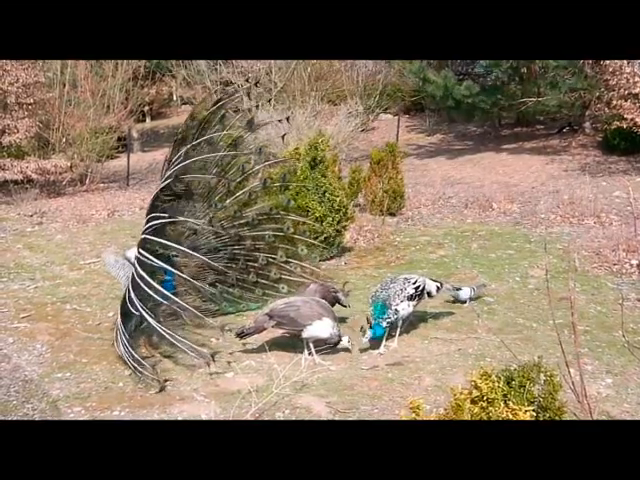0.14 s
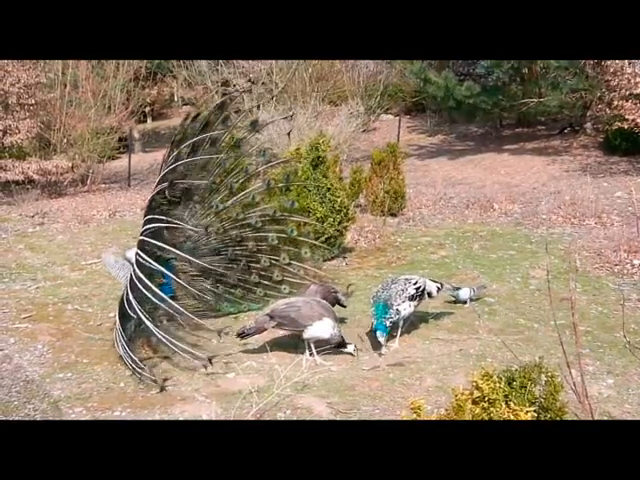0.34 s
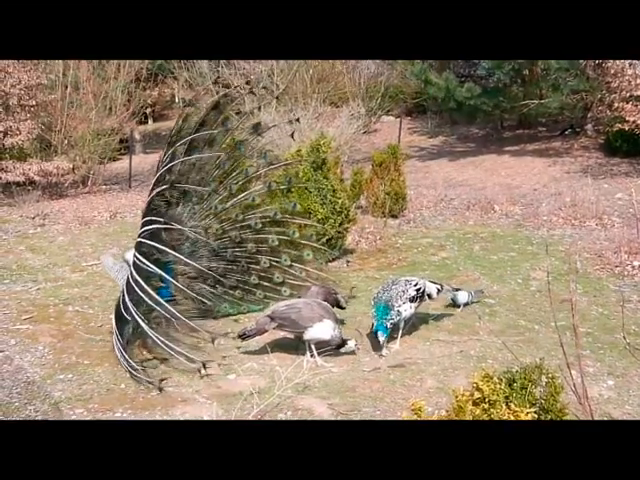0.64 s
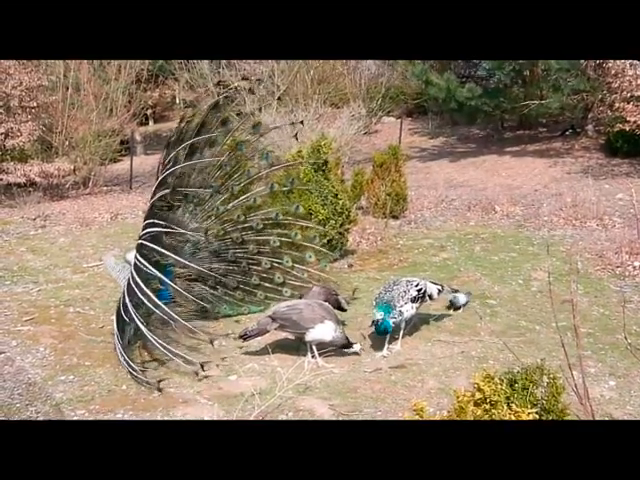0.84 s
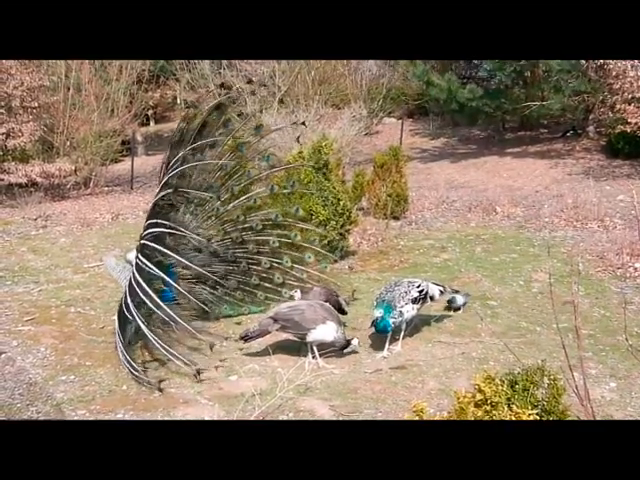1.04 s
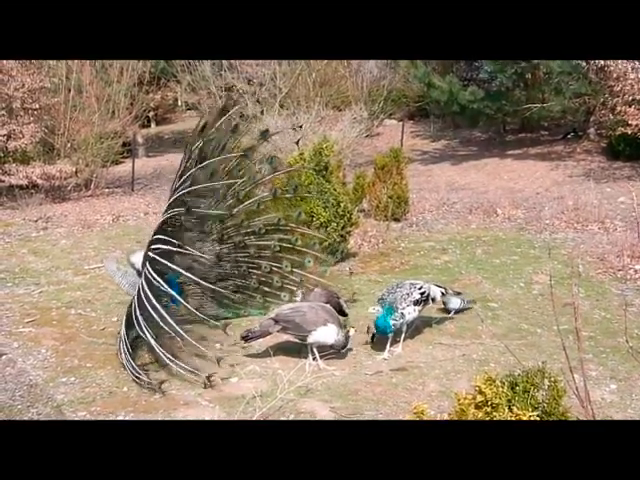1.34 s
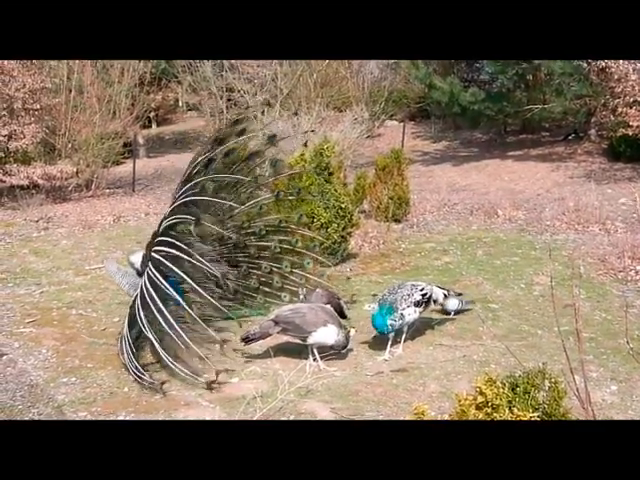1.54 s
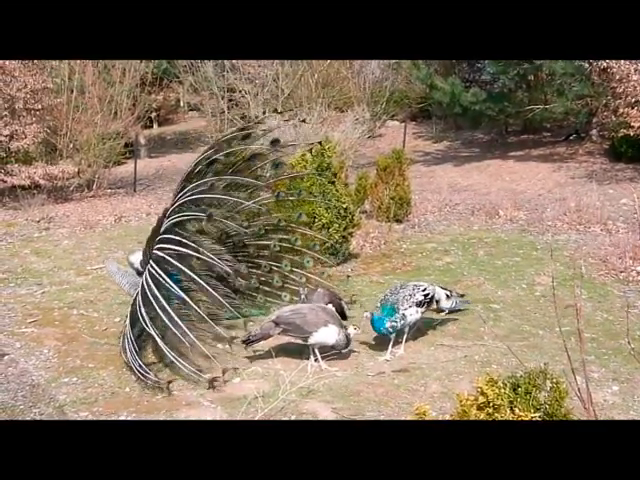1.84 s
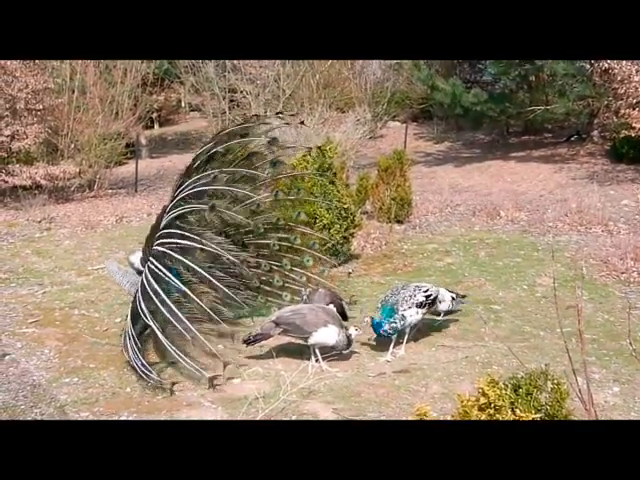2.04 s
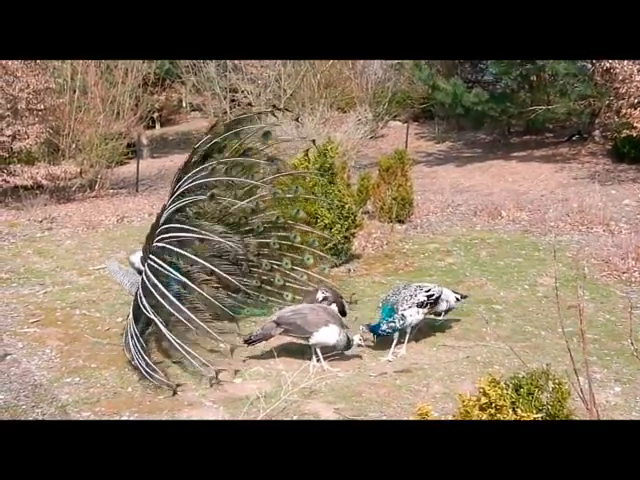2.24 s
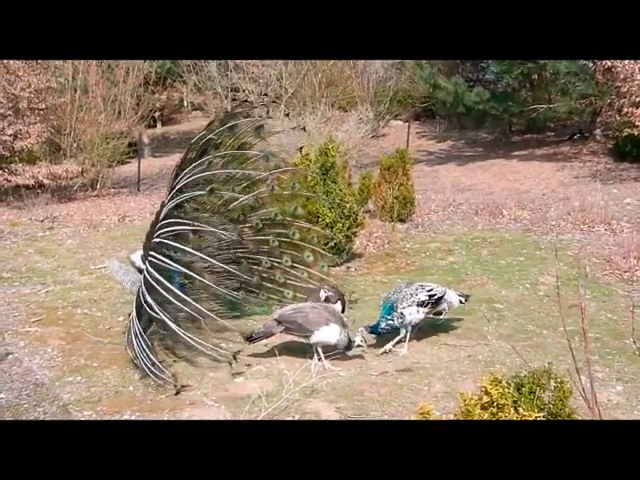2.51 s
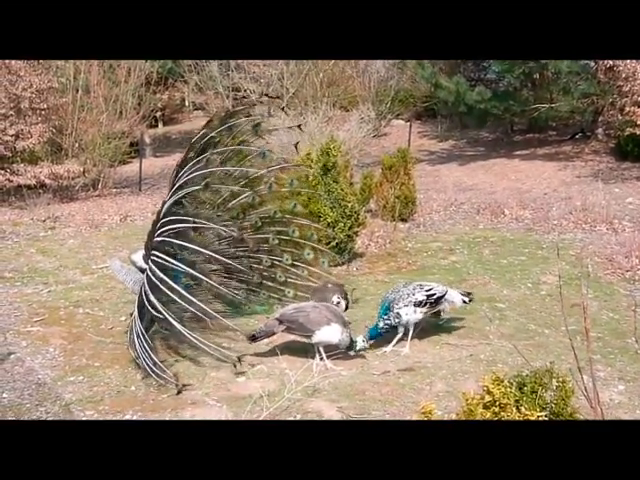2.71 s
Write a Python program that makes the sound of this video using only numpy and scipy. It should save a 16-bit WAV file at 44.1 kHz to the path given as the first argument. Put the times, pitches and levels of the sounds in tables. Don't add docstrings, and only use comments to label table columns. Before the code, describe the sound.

A peacock shivers its fanned train in dry, fast rattling bursts on an open lawn, stopping near two seconds; a songbird trills, a hen clucks softly and another bird whistles, with low wind thumps on the microphone.

```python
import sys
import numpy as np
from scipy import signal
from scipy.io import wavfile
from scipy.ndimage import uniform_filter1d

SR = 44100
rng = np.random.default_rng(int(sys.argv[2]) if len(sys.argv) > 2 else 0)


def natural_amplitude(level_db):
    exponent = np.asarray(level_db, float) / 20
    return 10 ** exponent


def unload_wav(signal):
    wavfile.write(
        sys.argv[1],
        SR,
        np.round(np.clip(np.atleast_2d(signal).T, -1, 1) * 32767).astype(np.int16),
    )


N = 126567

# time in seconds, level in dB.
SHIVER_VIGOUR = [(0, -48.5), (.17, -43), (.275, -44), (.315, -48.5), (.46, -51), (.51, -47), (.77, -44.5),
                 (.8, -54.5), (.85, -48.5), (.92, -57), (.97, -50), (1.11, -41), (1.385, -40),
                 (1.42, -43.5), (1.64, -46.5), (1.765, -56), (1.82, -50.5), (1.95, -62.5)]
# middle in seconds, change in dB, half width in seconds.
SHAKE_SURGES = [(.07, 0, 0.011), (.12, 1.5, 0.01), (.39, 0.5, 0.013), (.54, 0.5, .015), (.63, -1, .015),
                (.7, 0, 0.017), (.89, 1.5, .01), (.228, 1.5, .012), (.97, 1.5, .01), (1.05, 2.5, 0.013),
                (1.15, 0.5, .01), (1.19, 1, 0.0071), (1.245, 0.5, .01), (1.3, 1, 0.013),
                (1.34, -0.5, 0.0091), (1.385, 0, .008), (1.412, -1.5, 0.023), (1.46, 3, 0.027),
                (1.514, -1.5, .006), (1.535, 1.5, 0.02), (1.625, 2.5, 0.01), (1.7, 2.5, 0.024),
                (1.738, 3.5, 0.012), (1.762, -1, .008), (1.785, 0.5, .01), (1.822, 2.5, 0.0059)]
# pitch in Hz, level in dB per Hz.
FEATHER_COLOUR = [(300, -29), (480, -18), (750, -4.5), (1000, -7), (1700, -3.5), (4000, -7), (9500, -9.5),
                  (14000, -16.5)]
# pitch in Hz, share from 0 to 1.
FAN_ALIKE = [(60, .7), (230, .95), (910, .96), (2000, .85), (3520, .76), (8000, .72), (13700, .55)]
# pitch in Hz, left over right in dB.
FAN_LEAN = [(60, -2.0), (230, -0.5), (910, -0.94), (3520, 2.1), (13700, 1.0)]

# time in seconds, pitch in Hz, level in dB.
GLIDE_DOWN = [
    (.965, 5800, -59),
    (.99, 5250, -56),
    (1.03, 4600, -52),
    (1.06, 4400, -52),
    (1.09, 4150, -55),
    (1.13, 4250, -54),
]
HELD_NOTE = [
    (1.52, 4150, -57),
    (1.58, 4260, -51.5),
    (1.65, 4270, -51.5),
    (1.69, 4350, -59),
]
FIRST_TRILL = [(1.69, 4350, -56), (1.72, 3920, -55), (1.745, 3700, -49), (1.775, 3500, -50),
               (1.835, 3380, -48), (1.862, 2980, -50), (1.876, 3000, -51), (1.895, 2700, -62)]
FIRST_CHIRP = [
    (1.918, 2700, -68),
    (1.935, 3250, -64),
    (1.94, 3500, -53),
    (1.952, 4050, -55),
    (1.96, 3900, -62),
]
SOFT_DIP = [
    (1.975, 2990, -65),
    (1.99, 2880, -64),
    (2.008, 2700, -68),
]
SECOND_CHIRP = [
    (2.008, 2570, -60),
    (2.02, 2800, -54),
    (2.045, 3900, -46),
    (2.052, 3950, -48),
    (2.061, 3600, -52),
]
SECOND_TRILL = [(2.07, 4350, -55), (2.082, 4120, -57), (2.11, 3750, -51.5), (2.138, 3470, -52),
                (2.16, 3430, -46.5), (2.19, 3400, -44), (2.225, 2930, -47.5), (2.255, 2950, -47),
                (2.268, 2700, -49), (2.288, 2880, -48), (2.305, 2700, -51)]
FALLING_TICK = [(2.278, 5500, -68), (2.286, 4800, -61), (2.294, 3950, -60), (2.3, 4000, -70),
                (2.31, 4050, -63), (2.33, 4150, -65), (2.37, 4250, -70)]
# time in seconds, pitch in Hz, level in dB.
WHISTLE_NOTE = [
    (2.475, 3850, -58),
    (2.488, 3810, -55),
    (2.498, 3930, -41),
    (2.512, 3954, -38),
    (2.526, 4060, -31.5),
    (2.548, 4013, -36),
    (2.572, 3988, -35.5),
    (2.585, 3945, -42.5),
    (2.596, 3900, -71),
]

# middle in seconds, level in dB, pitch in Hz.
HEN_CLUCKS = [
    (2.198, -44, 690),
    (2.221, -42, 646),
    (2.245, -36.5, 637),
    (2.268, -33.5, 620),
    (2.295, -33, 614),
    (2.749, -42.5, 610),
    (2.81, -38.5, 555),
]
# start in seconds, level in dB.
TURF_PECKS = [
    (1.647, -45),
    (2.384, -48),
    (2.65, -50),
    (2.746, -40),
    (2.756, -46),
    (2.782, -47),
    (2.81, -47),
]

# time in seconds, hum level in dB, hum pitch in Hz.
BREEZE_HUM = [(0, -45.5, 195), (.1, -48.5, 195), (.4, -59, 190), (1.6, -56, 195), (1.66, -54, 205),
              (2.0, -49, 208), (2.4, -49, 212), (2.62, -49.5, 225), (2.71, -47.5, 228), (2.87, -47, 218)]
# middle in seconds, change in dB, half width in seconds.
HUM_SWELLS = [(1.66, 12, 0.012), (1.8, 7, .025), (1.845, 0.5, 0.0092), (1.955, 8.5, 0.009),
              (2.11, 3, 0.027), (2.335, 4.5, 0.01), (2.36, 2.5, .01), (2.39, -4.5, .012),
              (2.435, 8.5, 0.027), (2.5, 9.5, 0.011), (2.55, 10, 0.01), (2.58, 9, 0.0067),
              (2.645, 8, 0.011), (2.675, -2, .01), (2.697, 13.5, 0.011), (2.73, 10, 0.014),
              (2.755, 5.5, 0.0096), (2.81, 7, .012), (2.845, -7, 0.0089), (2.865, 8, .008)]
# start in seconds, level in dB, pitch in Hz.
WIND_PUFFS = [(0.02, -56, 113), (0.09, -32, 81), (0.3, -39, 75), (0.53, -39, 70), (0.575, -40, 110),
              (0.73, -38, 65), (0.79, -40, 110), (1.385, -39, 60), (1.645, -37.5, 75), (1.735, -40, 70),
              (2.09, -40, 60), (2.271, -33.5, 75.5), (2.422, -33.5, 96)]
# time in seconds, level in dB.
WIND_BUFFET = [(0, -43), (.3, -46.5), (.45, -52.5), (1.6, -67), (1.7, -50), (2.0, -56), (2.3, -43.5),
               (2.87, -54.5)]

# pitch in Hz, level in dB per Hz.
AIR_COLOUR = [(30, -17), (48, -7), (130, -10), (350, -17.5), (700, -18.5), (2500, -27.5), (7000, -34.5),
              (13000, -41.5)]
# pitch in Hz, share (held within 0 to 0.99).
AIR_ALIKE = [(40, 1.5), (90, 0.5), (200, 1.5), (800, 1.2), (3000, -0.2), (13000, -4.1)]
# pitch in Hz, left over right in dB.
AIR_LEAN = [(40, -5), (90, -1), (250, -1.5), (1000, 6), (3500, 10.5), (13000, -1)]

# edge in Hz, treble in dB needed to go above it.
TREBLE_EDGES = [(12780, -58.5), (13550, -47)]


def unit(x):
    return x / np.sqrt(np.mean(x ** 2) + 1e-20)


def along(rows, column, t):
    return np.interp(t, [r[0] for r in rows], [r[column] for r in rows])


def at_hz(points, hz):
    return np.interp(np.log(hz), np.log([p[0] for p in points]), [p[1] for p in points])


def bumps(rows, t):
    return sum(db * np.exp(-((t - s) / wide) ** 2 / 2) for s, db, wide in rows)


def drift(rate):
    step = 40
    r = np.exp(-2 * step * np.pi * rate / SR)
    white = rng.standard_normal(N // step + 2002)
    slow = signal.lfilter([1], [1, -2 * r, r * r], white)[2000:]
    return np.interp(np.arange(N) / step, np.arange(len(slow)), unit(slow))


def colour(white, spectrum, likeness, balance, patch_db, tilt_db=0):
    out, shared = 0, drift(5)
    edges = 28 * 2 ** np.arange(0, 9.3, .5)
    for k, (low, high) in enumerate(zip(edges, edges[1:])):
        band = signal.butter(2, [low, high], "band", fs=SR, output="sos")
        mid, side = signal.sosfilt(band, white[k % 2])
        hz = np.sqrt(low * high)
        alike = np.clip(at_hz(likeness, hz), 0, .99)
        lean = natural_amplitude(at_hz(balance, hz) / 2)
        flicker_db = patch_db * (0.21 * shared + drift(18))
        gain = natural_amplitude(at_hz(spectrum, hz) + flicker_db + tilt_db * np.log2(hz / 3000))
        stereo = np.sqrt(1 + alike) * mid + np.sqrt(1 - alike) * side * [[1], [-1]]
        out = out + gain * stereo * [[lean], [1 / lean]]
    return unit(out)


def feathers(t):
    shakes_per_s, ticks_per_s = 25.3, 11000
    phase = 2 * np.pi * np.cumsum(shakes_per_s * (1 + .1 * drift(2.6))) / SR
    pulse = natural_amplitude(.5 * np.sin(phase) + .5 * np.sin(2 * phase + 1))
    size = natural_amplitude(2.4 * np.minimum(rng.exponential(1, (2, N)), 5))
    struck = rng.random((2, N)) < ticks_per_s * pulse / SR
    ticks = size * struck * rng.choice([-1, 1], (2, 2, N))
    vigour_db = along(SHIVER_VIGOUR, 1, t) + bumps(SHAKE_SURGES, t)
    brighter_db = 0.042 * (vigour_db - vigour_db.max())
    fan = colour(ticks, FEATHER_COLOUR, FAN_ALIKE, FAN_LEAN, patch_db=.7, tilt_db=brighter_db)
    settle = np.clip((2.3 - t) / 0.16, 0, 1)
    return fan * pulse * natural_amplitude(vigour_db + 3) * settle


def sing(rows, t, trill_hz=60.0, depth_hz=0.0, throb_db=0.0, start=0.0, ragged_db=2.9, partials=()):
    beat = 2 * np.pi * (np.cumsum(trill_hz * (1 + 0.091 * drift(36))) / SR)
    beat = np.cos(beat - beat[int(rows[0][0] * SR)] + start)
    phase = 2 * np.pi * np.cumsum(along(rows, 1, t) + depth_hz * beat) / SR
    gate = np.clip(np.minimum(t - rows[0][0], rows[-1][0] - t) / 0.0015, 0, 1)
    level_db = along(rows, 2, t)
    lift_db = (1 - .7) * (max(r[2] for r in rows) - level_db)
    tone = np.sin(phase)
    for k, db in enumerate(partials):
        tone = tone + natural_amplitude(db + lift_db) * np.sin((k + 2) * phase)
    return np.sqrt(2) * tone * gate * natural_amplitude(level_db + throb_db * beat + ragged_db * drift(42))


def place(x, pan_db, t, echo_db, start_s, t60_s):
    u = np.arange(SR // 2) / SR
    hits = rng.random((2, len(u))) < 1500 / SR
    taps = rng.standard_normal((2, len(u))) * hits * (u > start_s)
    taps = signal.lfilter(*signal.butter(2, 7000, fs=SR), taps * natural_amplitude(-60 * u / t60_s))
    taps = taps / np.sqrt((taps ** 2).sum(1, keepdims=True))
    wet = signal.fftconvolve(x[None], taps, axes=1)[:, :N]
    left, right = natural_amplitude(pan_db / 2), natural_amplitude(-pan_db / 2)
    direct = np.array([x * left, np.interp(t - .00005, t, x) * right])
    return direct * 2 / (left + right) + natural_amplitude(echo_db) * wet


def songbird(t):
    song = sing(GLIDE_DOWN, t, ragged_db=3.5) + sing(HELD_NOTE, t, ragged_db=2.0) + sing(SOFT_DIP, t)
    song = song + sing(FIRST_CHIRP, t) + sing(SECOND_CHIRP, t) + sing(FALLING_TICK, t, ragged_db=3.5)
    song = song + sing(FIRST_TRILL, t, trill_hz=70.5, depth_hz=110.0, throb_db=5.5, start=2.2, ragged_db=3.0)
    song = song + sing(SECOND_TRILL, t, trill_hz=60.5, depth_hz=175.0, throb_db=4.5, start=-1.7, ragged_db=2.0)
    return place(song, pan_db=12.0, t=t, echo_db=-12.5, start_s=.02, t60_s=.4)


def whistler(t):
    whistle = sing(WHISTLE_NOTE, t, ragged_db=.6, partials=[-21, -27])
    return place(whistle, pan_db=8.5, t=t, echo_db=-19.5, start_s=.07, t60_s=.36)


def hen(t):
    out, pulse_s = 0, .004
    for s, db, hz in HEN_CLUCKS:
        u = (t - s) / pulse_s
        phase = 2 * np.pi * hz * pulse_s * (u + .18 * u ** 2 / 8)
        out = out + natural_amplitude(db) * np.exp(-u ** 2 / 2) * (np.sin(phase) + natural_amplitude(-12) * np.sin(2 * phase))
    return out


def pecks(t):
    shape = sum(natural_amplitude(db) * (t > s) * np.exp(-np.maximum(t - s, 0) / 0.002) for s, db in TURF_PECKS)
    band = signal.butter(2, [350, 4500], "band", fs=SR, output="sos")
    return shape * unit(signal.sosfilt(band, rng.standard_normal(N)))


def breeze_hum(t):
    width_hz, evenness = 78.5, 0.38
    r = np.exp(-np.pi * width_hz / SR)
    white = rng.standard_normal((2, N)) + 1j * rng.standard_normal((2, N))
    wobble = signal.lfilter([1], [1, -2 * r, r * r], white)
    wobble = wobble / (np.abs(wobble) + 1e-9) ** evenness * natural_amplitude(1.2 * drift(27))
    turning = np.exp(2j * np.pi * np.cumsum(along(BREEZE_HUM, 2, t)) / SR)
    mid, side = (wobble * turning).real
    return unit(mid + .15 * side * [[1], [-1]]) * natural_amplitude(along(BREEZE_HUM, 1, t) + bumps(HUM_SWELLS, t))


def puffs(t):
    out = 0
    for s, db, hz in WIND_PUFFS:
        u = np.maximum(t - s, 0)
        swell = (1 - np.exp(-u / 0.0066)) * np.exp(-u / 0.034)
        out = out + natural_amplitude(db) * swell * np.sin(2 * np.pi * hz * u)
    return out


def buffet(t):
    band = signal.butter(2, [45.6, 154], "band", fs=SR, output="sos")
    mid, side = signal.sosfilt(band, rng.standard_normal((2, N)) * natural_amplitude(1.5 * drift(16.0)))
    lean_db = -2.5 * np.array([[.5], [-.5]])
    return unit(mid + .8 * side * [[1], [-1]]) * natural_amplitude(along(WIND_BUFFET, 1, t) + lean_db)


def outdoor_floor():
    white = rng.standard_normal((2, 2, N))
    return natural_amplitude(-47.5) * colour(white, AIR_COLOUR, AIR_ALIKE, AIR_LEAN, patch_db=.8)


def scene():
    t = np.arange(N) / SR
    animals = feathers(t) + songbird(t) + whistler(t) + hen(t) + pecks(t)
    wind = breeze_hum(t) + puffs(t) + buffet(t)
    return animals + wind + outdoor_floor()


def low_pass(x):
    return signal.sosfilt(signal.butter(12, 14290, fs=SR, output="sos"), x)


def record(dry):
    treble = signal.sosfilt(signal.butter(6, 9000, "high", fs=SR, output="sos"), dry.mean(0))
    power = uniform_filter1d(treble ** 2, size=2048)
    mix = dry
    for hz, need_db in TREBLE_EDGES:
        low = signal.sosfiltfilt(signal.ellip(10, .2, 60, hz, fs=SR, output="sos"), mix)
        is_open = uniform_filter1d(1. * (power > natural_amplitude(2 * need_db)), size=512)
        mix = low + (mix - low) * is_open
    return low_pass(mix)


dry = scene()
out = record(dry)
unload_wav(out)
```